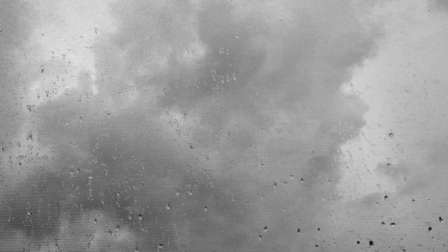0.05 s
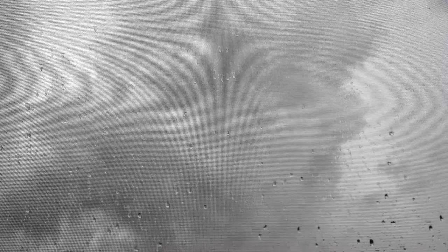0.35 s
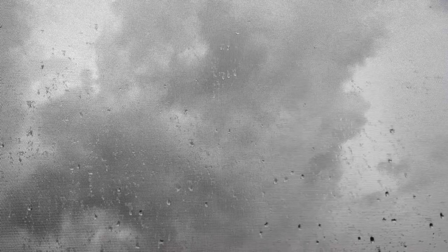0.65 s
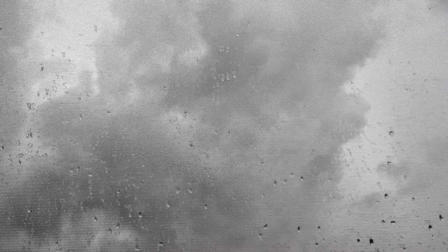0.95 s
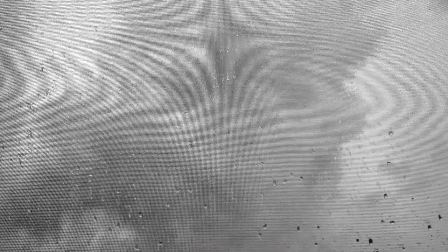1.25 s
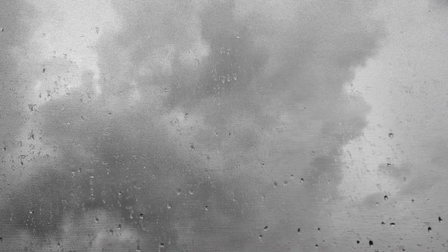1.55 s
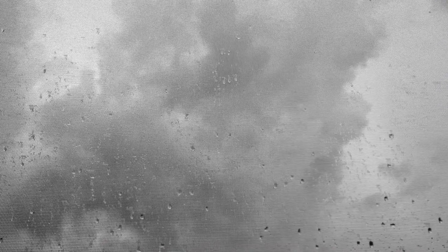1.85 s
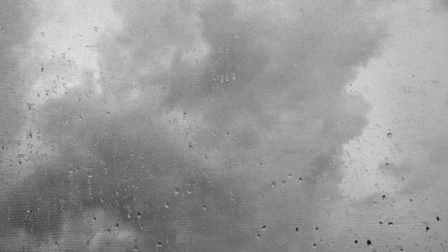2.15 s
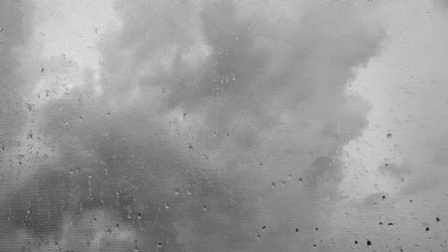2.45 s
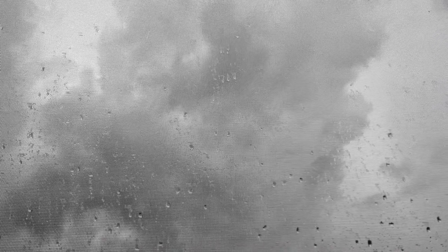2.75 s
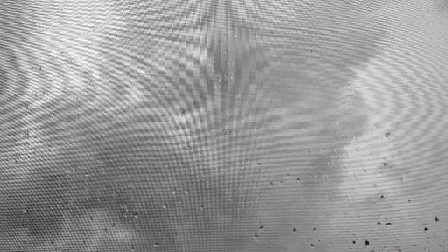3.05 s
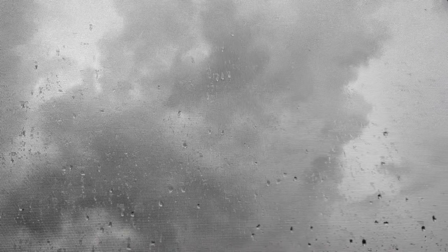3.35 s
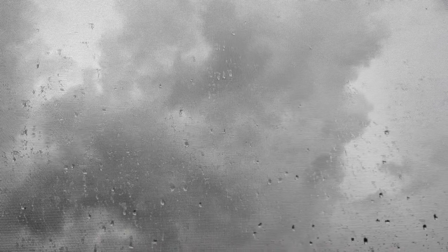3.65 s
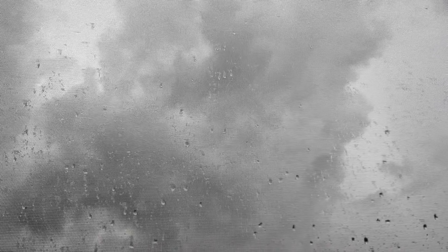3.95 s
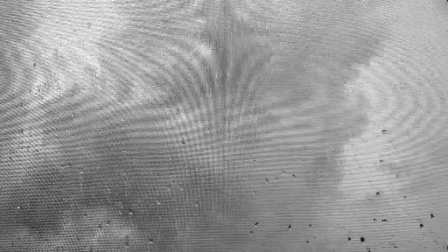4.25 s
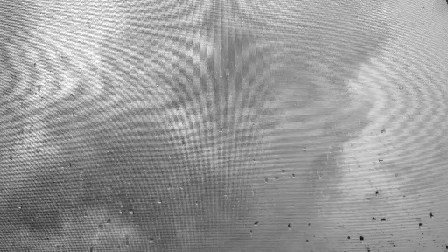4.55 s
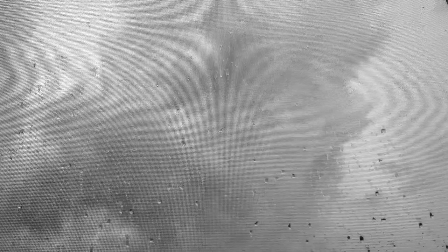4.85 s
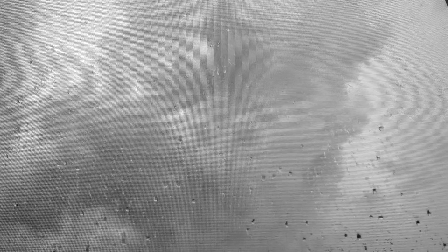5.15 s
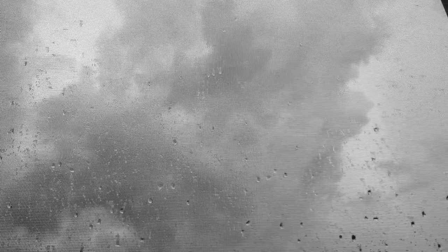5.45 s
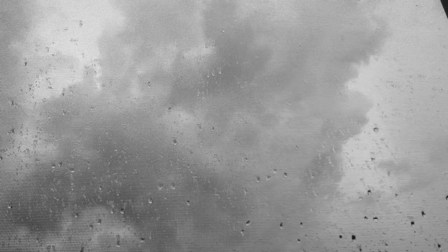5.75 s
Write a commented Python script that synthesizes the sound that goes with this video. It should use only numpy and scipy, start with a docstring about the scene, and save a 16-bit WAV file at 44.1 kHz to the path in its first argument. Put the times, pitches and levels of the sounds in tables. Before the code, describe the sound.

Sudden thunder cracks and rumbles over light rain, rolls on more softly and swells again, while a small bird twitters faintly.

```python
"""Thunder breaks over a garden in light rain, rolls on and swells again, heard on a stereo microphone.
Shock fronts from the crooked lightning channel arrive in a dense train with single claps standing out;
later ones come from farther away and sound deeper. Far rain merges into a wash, a small bird twitters
and a few drops tick close to the microphone, which adds its own thin hiss. The loudest claps overload
the recorder, whose gain control ducks and slowly recovers."""
import sys
import numpy as np
from scipy import signal
from scipy.fft import rfft, irfft, next_fast_len
from scipy.io import wavfile
from scipy.ndimage import uniform_filter1d

SR = 44100
rng = np.random.default_rng(int(sys.argv[2]) if len(sys.argv) > 2 else 0)


def log_audio(samples):
    """Write samples as a 16-bit WAV file to the path given in sys.argv[1]."""
    # one column per channel
    frames = np.atleast_2d(samples).T
    # limit to full scale, then quantise
    limited = np.clip(frames, -1, 1)
    pcm = np.round(limited * 32767).astype(np.int16)
    wavfile.write(sys.argv[1], SR, pcm)


N = 265041

# claps from stretches of the channel that lie broadside to the microphone:
# (time [s], hold [s], level [dB], tearing edge [dB re that level])
THUNDERCLAPS = [(.485, 0.02, -25.5, -16), (0.619, 0.03, -20.5, -13.5), (0.706, 0.044, -7, -25.5),
                (0.916, 0.04, -1.5, -18.5), (.974, 0.013, 4, -30.5), (1.194, 0.034, -3, -24),
                (1.409, 0.015, -9, -20.5), (1.487, 0.014, -7.5, -29), (1.869, 0.022, -12.5, -19),
                (2.099, 0.046, -13.5, -14.5), (2.316, 0.028, -6.5, -22), (2.483, 0.014, -6.5, -21),
                (2.804, 0.053, -14, -17), (2.868, 0.019, -6, -18), (2.929, 0.021, -10.5, -29.5),
                (4.008, 0.079, -20, -23), (4.205, 0.046, -25, -26), (4.32, 0.061, -27.5, -14.5),
                (4.644, 0.017, -26, -25), (4.777, 0.085, -24, -25), (4.904, 0.036, -22.5, -16.5),
                (5.066, 0.022, -21, -19.5), (5.214, 0.024, -14.5, -29), (5.287, 0.03, -18, -24),
                (5.507, 0.087, -15.5, -29), (5.765, 0.072, -16, -31)]


def from_db(db):
    return 10 ** (np.asarray(db) / 20)


def rms_one(x):
    return x / np.sqrt(np.mean(x ** 2) + 1e-20)


def panned(x, left_db):
    return x * from_db(np.array([[left_db], [-left_db]]) / 2)


def add(out, s, sound):
    """Mix a sound in at time s."""
    start = int(s * SR)
    part = sound[..., :max(N - start, 0)]
    out[..., start:start + part.shape[-1]] += part


def in_time(points):
    """A curve at every sample."""
    times, values = np.transpose(points)
    return np.interp(np.arange(N) / SR, times, values)


def at_hz(points):
    """A curve over log frequency at every FFT bin."""
    hz, values = np.transpose(points)
    size = next_fast_len(N)
    bin_hz = np.arange(size // 2 + 1) * SR / size
    return np.interp(np.log(bin_hz + 1), np.log(hz), values)


def running_rms(x, window_s):
    """Level of both channels under a triangular window."""
    size = max(int(window_s * SR), 2)
    power = np.mean(x ** 2, axis=0)
    smoothed = uniform_filter1d(uniform_filter1d(power, size), size)
    return np.sqrt(np.abs(smoothed) + 1e-12)


def impulses(per_s, spread_db):
    """Two trains of impulses at random moments, of uneven size and either sign."""
    born = rng.random((2, N)) < per_s / SR
    sizes = from_db(spread_db * np.minimum(rng.exponential(1, (2, N)), 4))
    return born * sizes * rng.choice([-1, 1], (2, N))


def coloured(pair, spectrum, likeness):
    """Two unrelated signals become a stereo sound of that spectrum, falling away past its ends; rms 1."""
    size = next_fast_len(N)
    (low_hz, low_db), (high_hz, high_db) = spectrum[0], spectrum[-1]
    closed = [(low_hz / 2, low_db - 40), *spectrum, (high_hz * 2, high_db - 70)]
    mid, side = rfft(pair, size) * from_db(at_hz(closed))
    alike = np.clip(at_hz(likeness), -1, 1)
    left_right = np.sqrt(1 + alike) * mid + np.sqrt(1 - alike) * side * [[1], [-1]]
    return rms_one(irfft(left_right, size)[:, :N])


def shocks(spectrum, per_s, spread_db, steady_s):
    """A train of shock fronts rounded by the air, held at an even level."""
    # thunder across the microphone pair: (frequency [Hz], left-right likeness [0..1])
    likeness = [(60, 1), (130, 0.97), (250, 0.98), (500, 0.87), (1000, 0.33)]
    train = coloured(impulses(per_s, spread_db), spectrum, likeness)
    return train / running_rms(train, steady_s)


def ground_echo(x, first_lag_s, last_lag_s, echo_db):
    """The sound comes from ever lower in the sky, so the lag of its reflection slides."""
    n = np.arange(N)
    late = n - np.linspace(first_lag_s, last_lag_s, N) * SR
    return x + from_db(echo_db) * np.array([np.interp(late, n, side) for side in x])


def air_fading(x, depth_db):
    """Paths through moving air add and cancel, so lumps some tens of hertz wide come and go."""
    _, _, cells = signal.stft(x, nperseg=4096)
    lumps = uniform_filter1d(rng.standard_normal(cells.shape[1:]), size=5, axis=0)
    lumps = uniform_filter1d(lumps, size=3, axis=1)
    _, faded = signal.istft(cells * from_db(depth_db * rms_one(lumps)))
    return faded[:, :N]


def gliding_band(hz, level_db, width_hz):
    """A narrow band of the rumble with a moving pitch and strength."""
    centre = np.mean(hz)
    band = [(centre - width_hz, -18), (centre - width_hz / 2, 0),
            (centre + width_hz / 2, 0), (centre + width_hz, -18)]
    rumble = shocks(band, per_s=600, spread_db=-3.0, steady_s=0.042)
    analytic = signal.hilbert(rumble, next_fast_len(N))[:, :N]
    shift = np.exp(2j * np.pi * np.cumsum(hz - centre) / SR)
    return from_db(level_db) * np.real(analytic * shift)


def resonances():
    """Three narrow bands colour the thunder: a sinking throb, passing moans and a fading bark."""
    # strength of the throb: (time [s], relative level [dB])
    throb_levels = [(0, -1), (1.8, 1), (2.7, -7), (3.5, -6.5), (3.95, 10), (4.35, -1.5), (6, -6.5)]
    # brief moans in the rumble: (time [s], pitch [Hz], relative level [dB])
    moans = [(2.33, 125, 0.5), (3.571, 330.9, -1), (3.82, 278.4, -6), (4.03, 155, 5), (4.2, 330, 3),
             (4.369, 234.7, 2), (4.63, 313.2, 0), (4.85, 329.6, -8), (5.22, 210, 2), (5.33, 321.8, -3),
             (5.55, 400, -8), (5.79, 200, 0)]
    t = np.arange(N) / SR
    near_hz, far_hz, sink_s = 227.1, 92, 2.3
    throb_hz = far_hz + (near_hz - far_hz) * np.exp(-t / sink_s)
    throb = gliding_band(throb_hz, in_time(throb_levels), width_hz=32.7)
    fade_s, rest_db = .11, -14.5
    moans_db = np.array([level_db - 10 * ((t - s) / fade_s) ** 2 for s, _, level_db in moans])
    moan_hz = np.array(moans)[np.argmax(moans_db, axis=0), 1]   # the strongest sets the pitch
    moan = gliding_band(moan_hz, np.maximum(moans_db.max(axis=0), rest_db), width_hz=34)
    # the bark of the near strokes fades steadily with distance
    bark = gliding_band(hz=np.full(N, 417.8), level_db=-8.5 - 2.5 * t, width_hz=115)
    return throb + moan + bark


def clap_gain(bed_db, peaks_db):
    """Gain over time: each clap rises fast, holds and dies away, adding its power to the roll."""
    attack_s, release_s = .022, 0.044   # to rise and to fall by 20 dB
    t = np.arange(N) / SR
    power = from_db(bed_db) ** 2
    for (s, hold_s, _, _), peak_db in zip(THUNDERCLAPS, peaks_db):
        away = np.maximum((s - t) / attack_s, (t - s - hold_s) / release_s)
        near = away < 2
        power[near] += from_db(peak_db - 20 * np.maximum(away[near], 0)) ** 2
    return np.sqrt(power)


def house_walls(x, echo_db, count=8):
    """A few early reflections from the house give a steady, slightly hollow colour."""
    out = x.copy()
    for lag in (rng.uniform(.004, .035, count) * SR).astype(int):
        out[:, lag:] += from_db(echo_db) * rng.choice([-1, 1]) * x[:, :-lag]
    return rms_one(out)


def thunder():
    """Shock trains swell with the roll and its claps; some claps tear brightly, others only thud."""
    # deep boom, middle body and tearing edge: (frequency [Hz], spectral level [dB])
    boom_spectrum = [(12, -31), (25, -22.5), (42, -8), (54, -2), (64, 0), (76, -1.5), (95, -0.5),
                     (125, -21.5)]
    body_spectrum = [(75, -21.5), (105, 0), (135, -1), (185, 0.5), (240, -1.5), (290, -4.5), (345, -8.5),
                     (380, -15), (480, -40)]
    edge_spectrum = [(280, -12), (400, 0), (480, -1), (560, -0.5), (680, -4.5), (800, -11), (1000, -14.5),
                     (1250, -27.5), (1600, -42), (2500, -61.5)]
    # continuous roll under the claps: (time [s], level [dB])
    roll_levels = [(0, -46.5), (.3, -46.5), (.46, -33.5), (.68, -31.5), (.8, -12.5), (1.0, -5.5),
                   (1.17, -5), (1.33, -11.5), (2.03, -14.5), (2.2, -12), (2.36, -6.5), (2.8, -10),
                   (3.0, -19), (3.56, -29), (3.74, -24), (4.5, -28.5), (5.6, -21), (6.0, -24)]
    # the boom gains as the sound comes from farther away: (time [s], level [dB re body])
    boom_levels = [(0, -10), (1.3, -9.5), (2.8, -8), (3.75, 0.5), (4.35, -2), (5.3, -5), (6, 1.5)]
    # tearing upper edge: (time [s], level [dB re roll])
    edge_levels = [(0, -14), (.65, -14.5), (1.1, -18.5), (2.2, -15.5), (2.85, -16.5), (3.15, -22.5),
                   (3.4, -20.5), (3.8, -23.5), (4.5, -20), (5.1, -18), (5.4, -23.5), (6, -24)]
    roll_db = in_time(roll_levels)
    _, _, claps_db, clap_edges_db = np.transpose(THUNDERCLAPS)

    body = shocks(body_spectrum, per_s=150, spread_db=3.5, steady_s=0.065)
    body = ground_echo(body, first_lag_s=0.01542, last_lag_s=.009, echo_db=-16)
    body = from_db(2.0) * rms_one(air_fading(body, depth_db=2.0)) + resonances()
    body = panned(body / running_rms(body, window_s=0.022), left_db=2.0)
    boom = shocks(boom_spectrum, per_s=400, spread_db=2.0, steady_s=.17)
    roll = body + panned(from_db(in_time(boom_levels)) * boom, left_db=3.0)
    roll = clap_gain(roll_db, claps_db) * roll / running_rms(roll, window_s=0.019)

    edge = shocks(edge_spectrum, per_s=1400, spread_db=2.0, steady_s=0.19)
    edge = house_walls(edge, echo_db=-17)
    edge *= clap_gain(roll_db + in_time(edge_levels), claps_db + clap_edges_db)
    return roll + panned(edge, left_db=-0.3)


def rain_and_microphone_hiss():
    """Far rain merges into a soft wash; the microphone adds its own thin, high hiss."""
    # far rain: (frequency [Hz], spectral level [dB])
    wash_spectrum = [(60, -1), (350, 2), (620, 3.5), (780, 3.5), (1000, -3.5), (1280, 1.5), (1650, -7.5),
                     (2300, -5), (3300, -12.5), (5600, -22), (6700, -19), (7900, -26.5), (9000, -24.5),
                     (11200, -35.5)]
    # the microphone's own noise: (frequency [Hz], spectral level [dB])
    hiss_spectrum = [(11200, -20), (12200, 4), (15500, -0.5), (16200, -20.5)]
    # stereo image of both sounds: (frequency [Hz], left-right likeness [0..1])
    likeness = [(100, .9), (500, 0.32), (1200, .25), (2500, 0.028), (5000, 0)]
    wash = coloured(impulses(per_s=9900, spread_db=2.5), wash_spectrum, likeness)
    wash = house_walls(wash, echo_db=-17.5)
    hiss = coloured(impulses(per_s=15000, spread_db=3.0), hiss_spectrum, likeness)
    return panned(from_db(-51) * wash, left_db=0.5) + panned(from_db(-69) * hiss, left_db=-1.0)


def bird():
    """A small bird in the garden whistles bent notes; a fast flutter makes the higher ones scratchy."""
    # notes: (time [s], length [s], pitch [Hz], relative level [dB], kind of bend)
    chirps = [(0.415, 0.046, 5400, -66.5, "fall"), (0.445, .055, 4280, -54.5, "rise"),
              (0.523, 0.037, 6100, -57.5, "arch"), (0.564, 0.05, 3940, -55, "dip"),
              (0.601, 0.025, 4430, -53, "level"), (0.609, .05, 2220, -51, "rise"),
              (0.686, .069, 2270, -52, "level"), (1.504, 0.059, 4060, -55, "dip"),
              (1.73, .04, 4210, -62.5, "fall"), (2.483, 0.028, 6710, -53, "arch"),
              (2.776, .07, 4000, -59, "fall"), (2.818, 0.053, 4350, -60.5, "rise"),
              (2.96, .05, 4250, -57, "fall"), (3.25, 0.066, 3920, -58.5, "dip"),
              (4.05, 0.013, 6550, -57.5, "level"), (4.331, .04, 4410, -62, "fall"),
              (4.859, .055, 4450, -56.5, "dip"), (4.91, .069, 4550, -58, "rise"),
              (5.002, 0.068, 6640, -64, "level"), (5.073, 0.089, 4040, -59, "dip"),
              (5.427, 0.029, 4050, -61, "level"), (5.495, .052, 4220, -60, "fall"),
              (5.74, 0.034, 5900, -60, "arch"), (5.77, 0.058, 4080, -53, "rise"),
              (5.925, 0.048, 4240, -58, "fall")]
    # pitch bend of each kind: (start, middle, end) [ratio to the note's pitch]
    bends = {"fall": (1.3, 0.98, 0.97), "dip": (1.3, 0.96, 1.4), "rise": (.93, 0.99, 1.03),
             "arch": (0.58, 0.97, .87), "level": (1.01, 0.97, 1)}
    song_db, echo_db = -10, 3
    song = np.zeros(N)
    for s, length_s, pitch_hz, level_db, kind in chirps:
        progress = np.linspace(0, 1, int(length_s * SR))
        flutter = np.interp(progress, np.linspace(0, 1, 80), rng.standard_normal(80))
        rasp = .032 * min(pitch_hz / 4300, 1) ** 2
        hz = pitch_hz * np.interp(progress, [0, .5, 1], bends[kind]) * (1 + rasp * flutter)
        swell = np.sqrt(2 * np.abs(np.sin(np.pi * progress)))
        whistle = np.sin(2 * np.pi * np.cumsum(hz) / SR)
        add(song, s, from_db(level_db + song_db) * swell * whistle)
    return song + from_db(echo_db) * garden_echo(song)


def garden_echo(x, t60_s=.3):
    """Diffuse scatter from walls and leaves, different on each side of the microphone."""
    t = np.arange(SR // 2) / SR
    tail = rng.standard_normal((2, len(t))) * from_db(-60 * t / t60_s)
    tail /= np.sqrt(np.sum(tail ** 2) / 2)
    return signal.fftconvolve(x[None], tail, axes=1)[:, :N]


def splashes(landings, hz, t60_s, width=0.23):
    """Each drop lands in a tiny splash, a band of noise that dies at once."""
    out = np.zeros((2, N))
    t = np.arange(SR // 10) / SR
    edges_hz = [hz / (1 + width), min(hz * (1 + width), .45 * SR)]
    band = signal.butter(1, edges_hz, "band", fs=SR, output="sos")
    for s, level_db in landings:
        splash = rms_one(signal.sosfilt(band, rng.standard_normal((2, len(t)))))
        add(out, s, from_db(level_db - 60 * t / t60_s) * splash / 2)
    return panned(out, left_db=-0.5)


def near_drops():
    """Small drops tick close to the microphone; a heavy drip lands in a duller, longer splat."""
    # landings of the small drops and of the drip: (time [s], relative level [dB])
    ticks = [(.688, -45.5), (2.837, -39), (3.372, -45), (4.003, -46), (4.161, -42), (4.946, -47),
             (5.025, -47), (5.099, -42), (5.477, -44), (5.626, -45)]
    splat = [(4.903, -45), (4.917, -41.5)]
    return splashes(ticks, hz=13200, t60_s=0.012) + splashes(splat, hz=3480, t60_s=0.084)


def overload_snaps(corner_hz=1550, gain_db=-5.0):
    """Each snap is one kink in the wave, its spectrum falling towards the treble."""
    # overload snaps placed in the loudest thunder: (time [s], relative peak [dB])
    snaps = [(.743, -24), (.932, -28.5), (.941, -31), (.948, -21), (.985, -27), (2.405, -29.5),
             (2.497, -34.5)]
    band = signal.butter(2, [corner_hz / 2, corner_hz * 1.4], "band", fs=SR, output="sos")
    kink = signal.sosfilt(band, signal.unit_impulse(SR // 100))
    kink /= np.max(np.abs(kink))
    out = np.zeros(N)
    for s, peak_db in snaps:
        add(out, s, from_db(peak_db + gain_db) * kink)
    return panned(out, left_db=2.0)


def gain_control(x, threshold_db, release_s, attack_s):
    """The recorder's gain drops quickly by the excess over the threshold and creeps back over seconds."""
    level_db = 20 * np.log10(running_rms(x, window_s=0.037))
    excess_db = np.maximum(level_db - threshold_db, 0)
    fade = np.exp(-np.arange(N) / SR / release_s)
    held_db = np.maximum.accumulate(excess_db / fade) * fade
    pole = np.exp(-1 / (attack_s * SR))
    duck_db = signal.lfilter([1 - pole], [1, -pole], held_db)
    return x * from_db(-duck_db)


def scene():
    """Thunder over the garden, with far rain, microphone hiss, the bird and the near drops."""
    return thunder() + rain_and_microphone_hiss() + bird() + near_drops()


def record(dry):
    """The recorder ducks, flattens the crests, adds its snaps and cuts the top treble."""
    ducked = gain_control(dry, threshold_db=-8.0, release_s=1.48, attack_s=0.019)
    flattened = ducked / (1 + np.abs(ducked) ** 12) ** (1 / 12)
    cutoff_hz = 15750
    top_cut = signal.ellip(10, .1, 80, cutoff_hz, fs=SR, output="sos")
    return signal.sosfilt(top_cut, flattened + overload_snaps())


dry = scene()
out = record(dry)
log_audio(out)
```